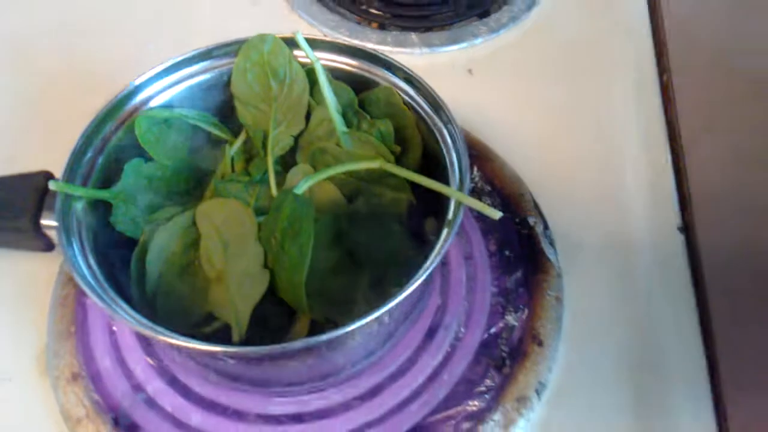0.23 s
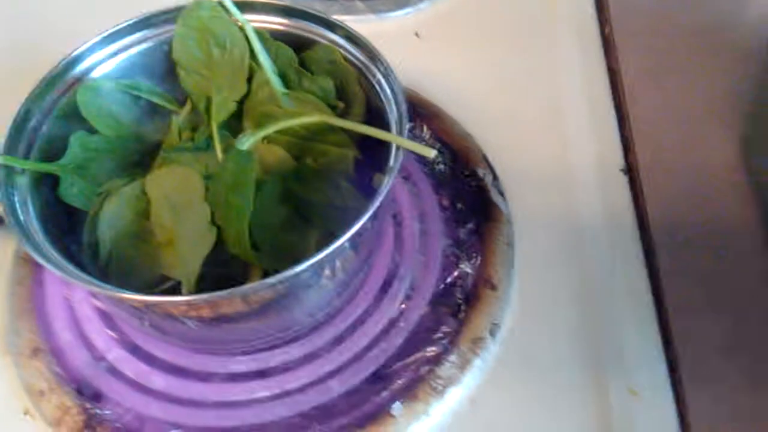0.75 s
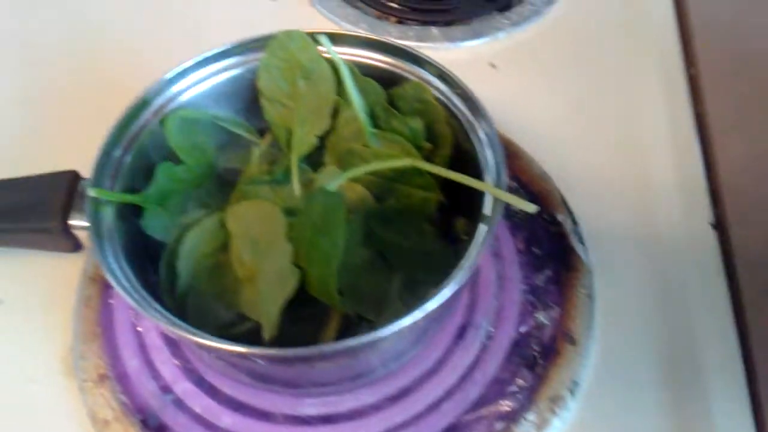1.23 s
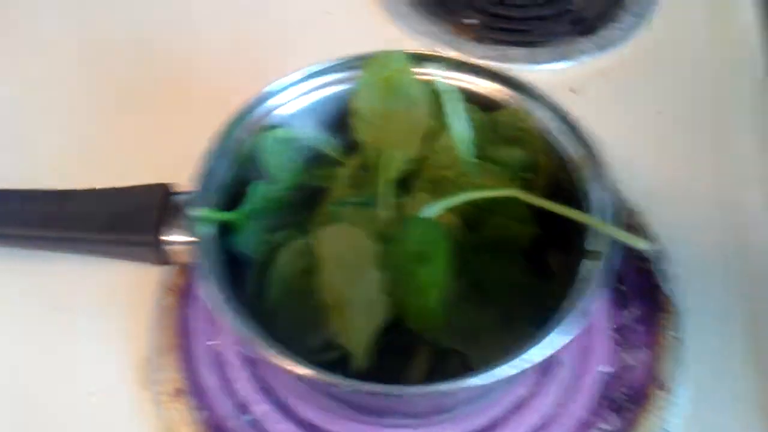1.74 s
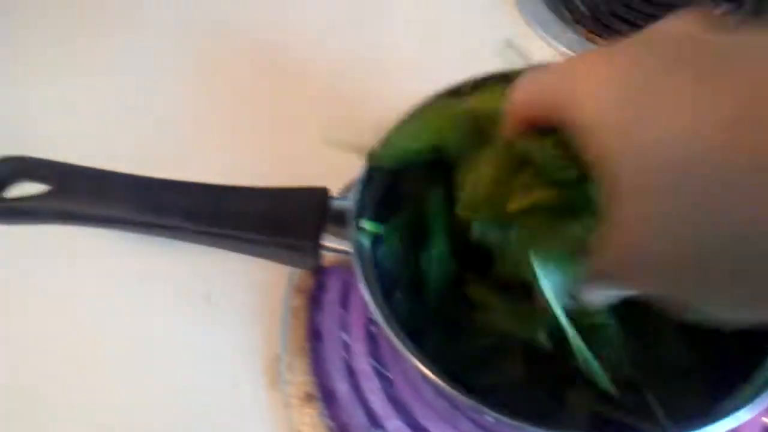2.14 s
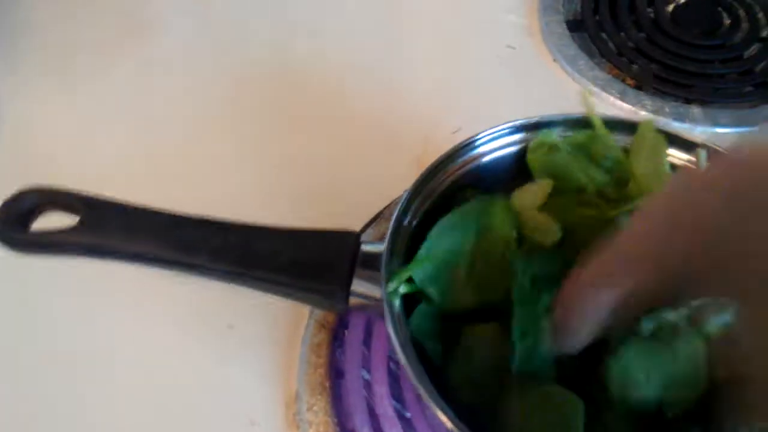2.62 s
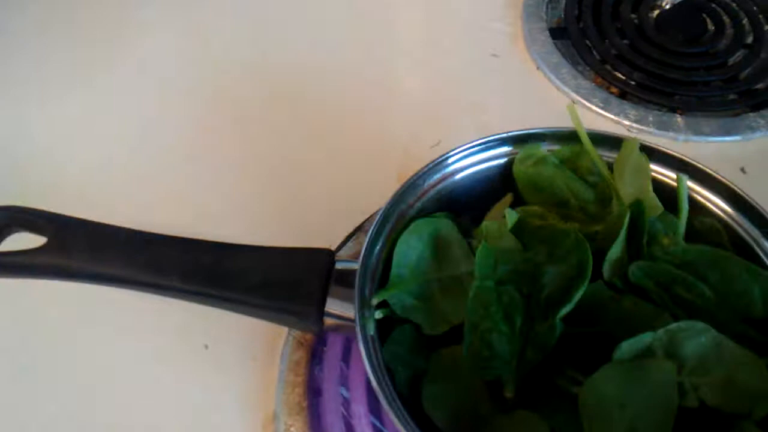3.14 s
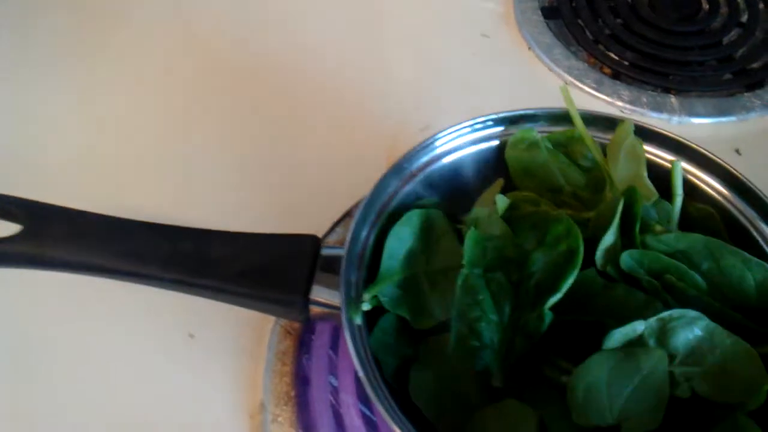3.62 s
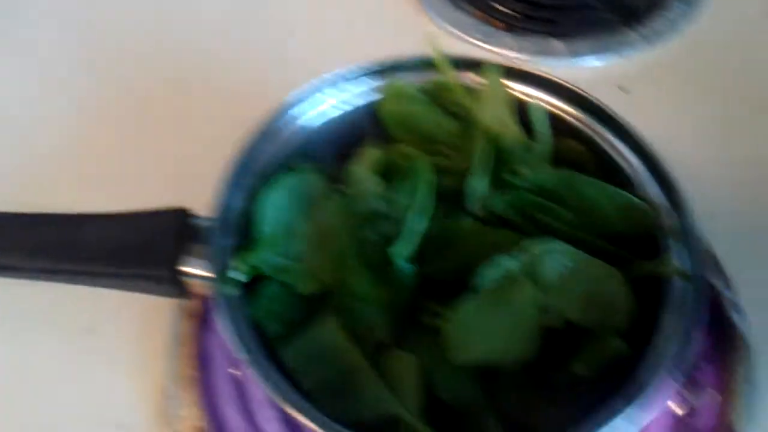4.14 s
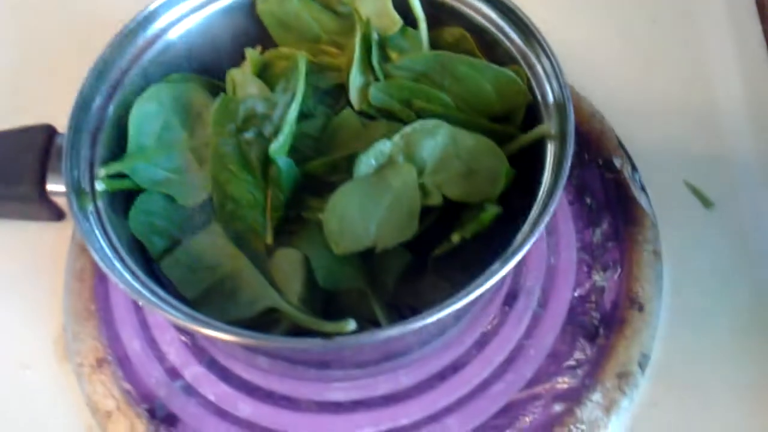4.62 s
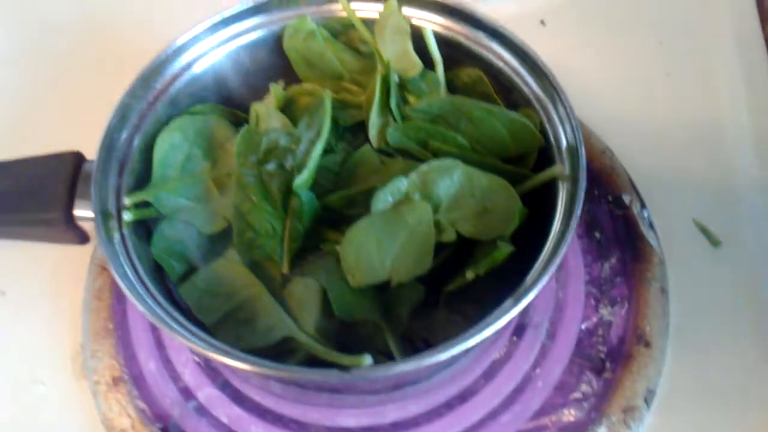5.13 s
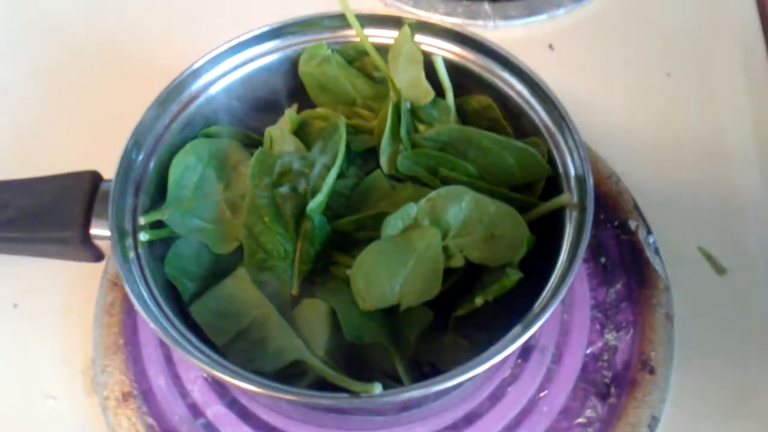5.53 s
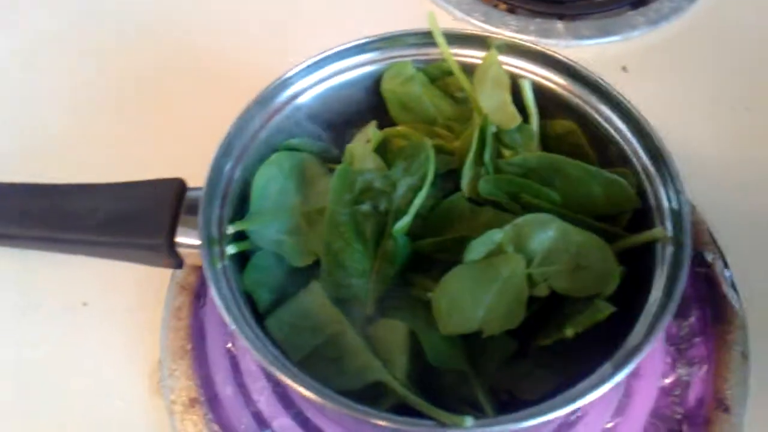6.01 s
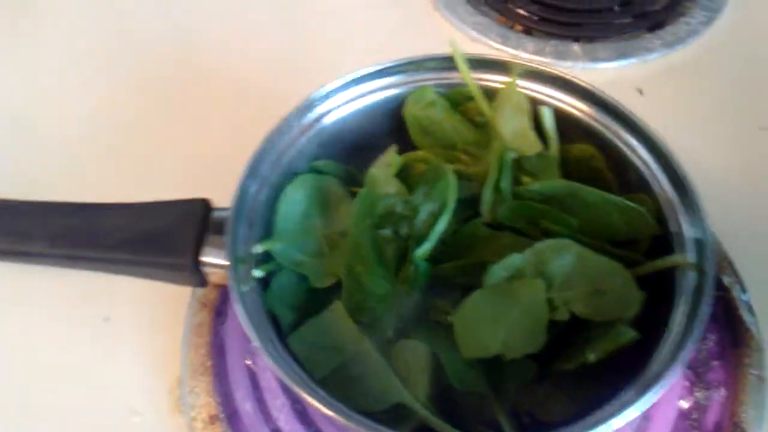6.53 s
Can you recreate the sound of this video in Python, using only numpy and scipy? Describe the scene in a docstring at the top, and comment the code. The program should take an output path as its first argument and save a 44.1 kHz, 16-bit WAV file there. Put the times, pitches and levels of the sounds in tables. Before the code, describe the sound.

A thin plastic bag and leafy handfuls rustle and snap close up over faint hiss, with small squeaks, soft low knocks and handling bumps.

```python
"""A plastic bag is rustled and crinkled close up, in a room with a faint steady hiss and hum.
First come rustles and snaps; the loudest snap cracks past two seconds, then sparse strokes and a knot of squeaks.
After four and a half seconds the strokes crowd together, with dull low knocks and surges of handling rumble.
Rustle is grainy noise, snaps are noise bursts, knocks and squeaks are fluttering decaying or swelling sines;
rumble and hiss are shaped noise, a breathy tone is narrow noise, and the hum is two wavering sines."""
import sys
import numpy as np
from scipy import signal
from scipy.fft import rfft, irfft, next_fast_len
from scipy.io import wavfile
from scipy.ndimage import uniform_filter1d, map_coordinates

SR = 44100
rng = np.random.default_rng(int(sys.argv[2]) if len(sys.argv) > 2 else 0)


def transcribe(u):
    """Save the signal u as a 16-bit wav file named by the first command-line argument.

    u: samples, shape (n,) or (channels, n), limited to [-1, 1]; the rate is SR.
    q: integer samples, one column per channel.
    """
    v = np.clip(np.atleast_2d(u).T, -1, 1)
    q = np.round(v * 32767).astype(np.int16)
    wavfile.write(sys.argv[1], SR, q)


N = 298380  # length [samples]

# wavering hum tones: (frequency [Hz], level [dB])
HUM_TONES = [(587, -71.5), (343, -76)]
# colour of the steady hiss: (frequency [Hz], relative density [dB per Hz])
HISS_COLOUR = [(90, -28), (140, 7.5), (400, 1.5), (800, -4), (1300, -7), (2000, -13), (2500, -5.5),
               (3300, -19), (4100, -13), (5200, -18.5), (6400, -0.5), (8000, -10.5), (10000, -15.5),
               (16000, -15.5)]
# colour of the low handling rumble: (frequency [Hz], relative density [dB per Hz])
RUMBLE_COLOUR = [(15, -17), (30, -32), (45, -6.5), (60, 0), (83, -3), (95, -4.5), (110, -1), (122, -3.5),
                 (135, -30), (200, -59)]
# surges of the low handling rumble: (time [s], level [dB])
RUMBLE_SWELLS = [(0.0, -62), (2.05, -65), (2.09, -54.5), (2.43, -71), (2.79, -61), (2.96, -67), (4.39, -63),
                 (4.43, -54.5), (5.01, -61.5), (5.07, -53.5), (5.22, -71), (5.52, -52), (5.58, -63),
                 (6.35, -63.5), (6.39, -52), (6.52, -71), (6.69, -51), (6.77, -68)]
# faint breathy tone: (time [s], level [dB])
BREATHY_SWELLS = [(0, -62), (.6, -64), (1.2, -67.5), (1.8, -66.5), (2.3, -80), (4.3, -80), (5.0, -69.5),
                  (6.0, -81), (6.77, -92)]
# decay of the room: (frequency [Hz], time to fall 60 dB [s])
ROOM_DECAY = [(500, 0.53), (3000, 0.081), (10000, 0.087)]
# bag squeaks: (time [s], pitch [Hz], level [dB], length [s])
BAG_SQUEAKS = [(0.581, 3200, -56, 0.015), (1.623, 2270, -57, 0.053), (3.429, 1720, -56, 0.046),
               (3.828, 1700, -61, 0.047), (3.877, 4330, -38, 0.018), (3.874, 1680, -53.5, 0.025),
               (3.876, 2470, -49.5, 0.04), (3.897, 4310, -37.5, 0.021), (3.898, 2470, -44.5, 0.062),
               (3.897, 3080, -44, 0.047), (3.899, 5130, -50.5, 0.11), (3.915, 1810, -52, 0.028),
               (3.928, 4550, -52, 0.016), (3.93, 4000, -58, 0.065), (4.115, 1850, -58, 0.047),
               (4.122, 2400, -51, 0.0081), (5.548, 1590, -55, 0.028)]
# dull low knocks, perhaps on a plastic tub: (time [s], level [dB], pitch [Hz], time to fall 60 dB [s])
LOW_KNOCKS = [(.618, -44, 746, 0.082), (1.061, -46, 636, 0.033), (1.817, -53.5, 808, 0.072),
              (4.344, -49, 598, 0.097), (4.526, -39.5, 739, 0.066), (4.81, -49.5, 854, 0.22),
              (5.54, -52.5, 490, 0.2), (5.543, -49, 791, 0.076), (5.70, -52, 820, 0.067),
              (5.748, -46.5, 846, 0.11)]
# partials of a knock: (ratio to pitch, level [dB])
KNOCK_PARTIALS = [(.45, -14), (0.782, -6.5), (1.002, 5), (1.22, -5), (1.5, -16), (2.05, -19)]
# strokes of rustling, rise and fall over 20 dB:
# (loudest time [s], rustle level [dB], rise [s], fall [s], low part re rustle [dB])
RUSTLE_STROKES = [(0.0, -35, .05, 0.11, 0.5), (.165, -44, 0.042, 0.18, 13.5), (.25, -35.5, 0.17, 0.13, 10),
                  (.34, -41, 0.14, 0.049, -5), (.712, -46, 0.017, .15, 8), (.79, -41, 0.14, 0.32, 7),
                  (.9, -39.5, 0.32, 0.17, 3.5), (1.825, -52, 0.017, .17, 10),
                  (1.925, -44, 0.011, 0.19, -10), (1.984, -50, 0.074, 0.17, -18),
                  (2.135, -48, 0.017, .2, -1), (2.25, -29, 0.074, .13, -2), (2.483, -50, 0.029, 0.41, -18),
                  (2.681, -30, 0.093, 0.11, 2.5), (2.745, -35.5, 0.14, 0.038, 0),
                  (3.049, -57, 0.034, 0.09, 6), (3.09, -47, 0.026, 0.04, 0), (3.245, -46.5, 0.24, .14, -2),
                  (3.371, -51, .05, 0.11, -4), (3.445, -51, 0.077, 0.17, 6), (3.641, -61.5, 0.25, .3, -3),
                  (3.772, -51, 0.027, 0.071, -7), (3.84, -51, .045, 0.07, 4), (3.912, -52.5, .035, 0.12, 9),
                  (4.127, -51, 0.055, 0.11, 4), (4.351, -52, .03, 0.088, 6), (4.51, -42, 0.022, 0.33, 0),
                  (4.59, -40, 0.14, 0.23, -2), (4.67, -40.5, 0.12, 0.24, 1.5), (4.839, -36, 0.13, 0.24, 8),
                  (5.058, -43, 0.35, 0.18, -4), (5.275, -51, 0.35, 0.093, 3), (5.372, -48, 0.055, 0.39, 5),
                  (5.513, -42.5, .25, 0.14, -2), (5.948, -39.5, 0.37, 0.19, -0.5),
                  (6.19, -52.5, .03, 0.28, 1.5), (6.3, -49, 0.25, 0.074, 1.5),
                  (6.389, -43, 0.11, 0.13, 5.5), (6.569, -49, .12, 0.17, -1),
                  (6.686, -52, 0.065, .08, -2.5)]
# sharp crinkles of the bag, before filtering: (time [s], energy [dB], low part re energy [dB])
BAG_SNAPS = [(.0161, -23, -10), (.1518, -13, 6.5), (.247, -16, -3), (.262, -21, -8), (.3111, -19, -1.5),
             (.4293, -25.5, -30), (.6185, -40.5, 25), (.7076, -14.5, -12), (.7738, -14, 0),
             (.8452, -11, -10), (.9212, -7.5, -19), (.9572, -7.5, -32), (.998, -14.5, -19),
             (1.672, -32, -20), (1.8161, -21, 13.5), (1.973, -14, -22), (2.127, -20, -10),
             (2.1586, -16, -9), (2.216, -11, -20), (2.2346, -3.5, -16), (2.238, -5, -1.5),
             (2.258, -13, -16), (2.4379, -25, -25), (3.0155, -34, 1), (3.0534, -21.5, -18),
             (3.0863, -23.5, -22), (3.1328, -23, -21), (3.2863, -21.5, -13), (3.37, -17, 1),
             (3.4366, -29, 4), (3.4494, -27, -13), (3.6071, -26, -6), (3.6373, -25, -1), (3.7605, -20.5, 3),
             (3.8314, -18.5, -2), (3.9193, -23, 5), (4.0271, -29.5, -3), (4.1154, -20.5, 10.5),
             (4.2827, -23, -11), (4.3363, -29.5, -.5), (4.3446, -21.5, 9), (4.4435, -25.5, -7),
             (4.5041, -17.5, -8), (4.628, -22, -13), (4.83, -22, 19), (4.8386, -20, 14), (5.0295, -24, 2),
             (5.0482, -19.5, 12), (5.121, -16.5, -6), (5.1767, -28, -16), (5.3039, -24, 5),
             (5.3612, -21.5, 7), (5.3703, -10, 6), (5.4428, -24, 8), (5.5046, -12, -17), (5.5589, -18, -6),
             (5.694, -30.5, 8), (5.7734, -29, 8), (5.8724, -18, -3.5), (5.989, -9.5, -4), (6.1795, -22, -5),
             (6.2048, -21, -3), (6.2496, -22, 4), (6.3422, -20, 0), (6.359, -18, 10.5), (6.408, -21, 12),
             (6.467, -20, -14), (6.5423, -22, -5), (6.5607, -16.5, 0), (6.6004, -18.5, -7),
             (6.6307, -27, -1), (6.66, -27, 3)]
# basic colour of the bag: (frequency [Hz], relative density [dB per Hz])
BAG_COLOUR = [(240, -66.5), (400, -17.5), (545, -22.5), (579, -19), (814, -9), (1130, -14), (1630, -7),
              (4050, -2), (5110, 0.5), (6740, 2), (9610, -15.5), (16000, -23)]
# the ringing of the bag changes in steps; each step begins at: (time [s])
RINGING_STARTS = [0, 1.7, 2.47, 2.95, 4.42, 5.62]
# resonances and hollows, one list per step: (centre [Hz], width [Hz], lift [dB])
RINGING_RESONANCES = [
    [(2340, 620, -2), (4600, 610, 4.5), (6400, 1100, 8), (11200, 6100, -4.5)],
    [(925, 31, 7.5), (1720, 440, 6.5), (2400, 760, 4.5), (6100, 1200, 5.5), (7360, 360, 1),
     (11300, 8500, -5)],
    [(730, 170, -13), (1197, 160, 13.5), (1720, 71, 15.5), (4900, 840, 4.5), (6100, 180, 8),
     (11100, 3300, 0)],
    [(1710, 170, 17), (2470, 210, 10.5), (3020, 580, 10.5), (4810, 700, 11), (6500, 1500, 14),
     (9100, 2600, 14)],
    [(325, 86, 15), (790, 200, -3), (1470, 210, -4), (1876, 120, 6.5), (2310, 140, 4), (3300, 550, 6),
     (5000, 610, 10), (6270, 160, 4), (7020, 490, 5)],
    [(650, 350, -16), (1010, 143, 16), (1470, 220, -15.5), (1858, 160, 13), (2260, 340, 7.5),
     (3396, 220, 12), (4860, 410, 6), (7130, 1100, 6.5), (11800, 460, 4)],
]

HISS_DB = -64
BREATHY_HZ, BREATHY_HALF_WIDTH_HZ = 972, 40
ROOM_DB = -12.0
KNOCK_ATTACK_S = 0.0033
STROKE_ROUNDNESS = 0.89  # 1 = pointed swell, 2 = bell
SLIPS_PER_S, SLIP_SPREAD_DB, SLIP_LIFE_S = 500, 4.7, 0.0036
SNAP_T60_S, SETTLE_T60_S = 0.008, 0.045  # sharp snap, weaker longer tail
BAG_SPLIT_HZ = 3300  # low part below, high part above
TOP_HZ = 15850


def amp(db):
    """Decibels to gain."""
    return 10 ** (np.asarray(db) / 20)


def unit(x):
    """Scale to rms 1."""
    return x / np.sqrt(np.mean(x ** 2) + 1e-20)


def along(points, hz):
    """Read (Hz, value) points on a log frequency axis."""
    f, v = np.transpose(points)
    return np.interp(np.log(hz + 1), np.log(f + 1), v)


def curve(points):
    """Draw (s, value) points as one value per sample."""
    s, v = np.transpose(points)
    return np.interp(np.arange(N) / SR, s, v)


def wobble(rate):
    """A smooth random curve, rate knots a second."""
    knots = rng.standard_normal(int(N * rate / SR) + 4)
    return map_coordinates(knots, [np.arange(N) * rate / SR])


def filtered(x, response):
    """Multiply the spectrum of x by a response of frequency."""
    m = next_fast_len(N + SR // 2)
    hz = np.fft.rfftfreq(m, 1 / SR)
    return irfft(rfft(x, m) * response(hz), m)[..., :N]


def causal(x, colour_db):
    """Pass x through the minimum-phase filter of a dB colour, power gain 1, so attacks stay sharp."""
    size = 4096
    log_gain = np.maximum(colour_db(np.fft.rfftfreq(size, 1 / SR)), -100) * np.log(10) / 20
    cepstrum = irfft(log_gain)
    # folding the cepstrum forward leaves no sound before the attack
    cepstrum[1:size // 2] *= 2
    cepstrum[size // 2 + 1:] = 0
    kernel = irfft(np.exp(rfft(cepstrum)))
    return signal.fftconvolve(x, kernel / np.linalg.norm(kernel))[:N]


def bumps(modes, hz):
    """Resonant lifts and hollows in dB."""
    return sum(db / (1 + (2 * (hz - centre) / width) ** 2) for centre, width, db in modes)


def patchy(depth_db):
    """White noise with time-frequency patches of random gain."""
    z = signal.stft(rng.standard_normal(N), nperseg=256)[2]
    field = uniform_filter1d(rng.standard_normal(z.shape), 4, 0)
    field = uniform_filter1d(field, 8, 1)
    noise = signal.istft(z * amp(depth_db * unit(field)), nperseg=256)[1]
    return unit(noise[:N])


def grains(per_second, spread_db, life_s):
    """Envelope of tiny slips: random moments, a few much stronger than the rest."""
    hit = rng.random(N) < per_second / SR
    sizes = hit * amp(spread_db * np.minimum(rng.exponential(size=N), 3))
    return unit(signal.lfilter([1], [1, -np.exp(-1 / (life_s * SR))], sizes))


def background():
    """Steady hiss of patchy shaped noise and slightly unsteady hum of two sines."""
    t = np.arange(N) / SR
    hum = sum(amp(db + 1.1 * wobble(12.0)) * np.sin(2 * np.pi * hz * t + 0.21 * wobble(5))
              for hz, db in HUM_TONES)
    hiss = unit(filtered(patchy(1.9), lambda hz: amp(along(HISS_COLOUR, hz))))
    return hum + amp(HISS_DB) * hiss


def breathy_tone():
    """Noise through one narrow resonance gives an unsteady breathy pitch."""
    def narrow(hz):
        """One resonance around the tone."""
        return 1 / (1 + ((hz - BREATHY_HZ) / BREATHY_HALF_WIDTH_HZ) ** 2)

    breath = unit(filtered(rng.standard_normal(N), narrow))
    return amp(curve(BREATHY_SWELLS) + 2.8 * wobble(12)) * breath


def handling_rumble():
    """Bumps of the microphone as it is handled: lumpy low noise that surges and sinks."""
    lumps = amp(0.81 * wobble(18) + 1.7 * wobble(6)) * rng.standard_normal(N)
    rumble = unit(filtered(lumps, lambda hz: amp(along(RUMBLE_COLOUR, hz))))
    return amp(curve(RUMBLE_SWELLS)) * rumble


def room(x):
    """Each frequency of the room's answer dies at its own speed; a new noise tail every quarter second."""
    out, step = np.zeros(N + SR), SR // 4
    for start in range(0, N, step):
        hz, t, z = signal.stft(rng.standard_normal(SR // 3), SR, nperseg=256)
        decay = amp(-60 * t / along(ROOM_DECAY, hz)[:, None])
        tail = signal.istft(z * decay, SR, nperseg=256)[1]
        wet = signal.fftconvolve(x[start:start + step], tail / np.linalg.norm(tail))
        out[start + SR // 200:][:len(wet)] += wet  # the room answers 5 ms late
    return out[:N]


def knocks():
    """Dull low knocks: a rough low note with partials around it, dying fast."""
    out, t = np.zeros(N + SR), np.arange(SR // 4) / SR
    attack = 1 - np.exp(-t / KNOCK_ATTACK_S)
    for s, db, hz, t60 in LOW_KNOCKS:
        noise = rng.standard_normal((len(KNOCK_PARTIALS), len(t)))
        flutter = uniform_filter1d(noise, SR // 150, 1) * 17  # near rms 1
        ring = sum(amp(level_db + 4.1 * f) * np.sin(2 * np.pi * hz * ratio * t + 0.83 * f)
                   for (ratio, level_db), f in zip(KNOCK_PARTIALS, flutter))
        out[round(s * SR):][:len(t)] += amp(db - 60 * t / t60) * attack * ring
    return out[:N]


def squeaks():
    """Short squeaks of the bag: each a single pitch that swells and fades, a little unsteady."""
    out, t = np.zeros(N + SR), np.arange(SR // 4) / SR
    for s, hz, db, length in BAG_SQUEAKS:
        swell = np.abs(np.sin(np.pi * np.clip(t / length, 0, 1) ** 0.45)) ** 1.9  # peaks early
        flutter = uniform_filter1d(rng.standard_normal((2, len(t))), SR // 300, 1) * 12  # near rms 1
        rough = amp(2.5 * flutter[0]) * np.sin(2 * np.pi * hz * t + 0.6 * flutter[1])
        out[round(s * SR):][:len(t)] += amp(db) * swell * rough
    return out[:N]


def strokes():
    """Gains of the rustle and its low part: strokes swell and fade, overlapping ones add their power."""
    t, power = np.arange(N) / SR, np.zeros((2, N))
    for s, db, rise_s, fall_s, low_db in RUSTLE_STROKES:
        away = np.abs(t - s) / np.where(t < s, rise_s, fall_s)
        swell = amp(-20 * away ** STROKE_ROUNDNESS)
        power += amp([[db], [db + low_db]]) ** 2 * swell ** 2
    return np.sqrt(power)


def bag():
    """Rustle and snaps of the plastic share one colour, with resonances that change in steps."""
    gain, low_gain = strokes()
    slips = unit(grains(SLIPS_PER_S, SLIP_SPREAD_DB, SLIP_LIFE_S) + 1.41)  # grains over a steady rub
    slips = slips * amp(0.76 * wobble(70))
    high = np.pad(slips * gain * patchy(2.14), (0, SR))
    low = np.pad(slips * low_gain * patchy(4.2), (0, SR))

    t = np.arange(SR // 8) / SR
    shape = amp(-60 * t / SNAP_T60_S) + 0.34 * amp(-60 * t / SETTLE_T60_S)
    for s, db, rel_db in BAG_SNAPS:
        crack = shape * rng.standard_normal((2, len(t)))
        small, large = amp(db) * crack / np.linalg.norm(crack, axis=1, keepdims=True)
        high[round(s * SR):][:len(t)] += uniform_filter1d(small, 2)  # softens the extreme treble
        low[round(s * SR):][:len(t)] += large * amp(rel_db)

    low_pass = signal.butter(2, BAG_SPLIT_HZ, "low", fs=SR, output="sos")
    high_pass = signal.butter(2, BAG_SPLIT_HZ, "high", fs=SR, output="sos")
    raw = signal.sosfilt(low_pass, low[:N]) + signal.sosfilt(high_pass, high[:N])
    ringing = np.searchsorted(RINGING_STARTS, np.arange(N) / SR, "right") - 1
    return sum(causal(raw * (ringing == k), lambda hz: along(BAG_COLOUR, hz) + bumps(modes, hz))
               for k, modes in enumerate(RINGING_RESONANCES))


def scene():
    """Near sounds with their room, over the rumble, breathy tone, hiss and hum."""
    near = bag() + knocks() + squeaks()
    steady = handling_rumble() + breathy_tone() + background()
    return (near + amp(ROOM_DB) * room(near) + steady)[None]


def record(dry):
    """The microphone keeps nothing above its band limit."""
    return filtered(dry, lambda hz: hz < TOP_HZ)


dry = scene()
out = record(dry)
transcribe(out)
```